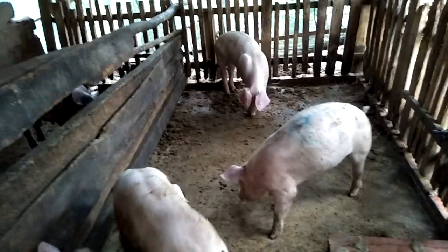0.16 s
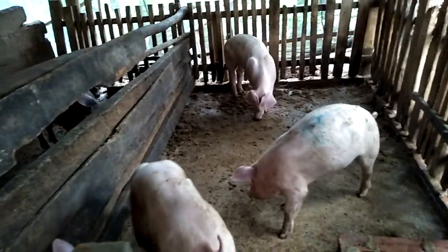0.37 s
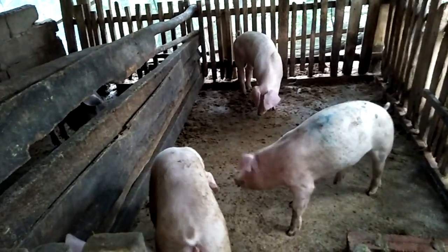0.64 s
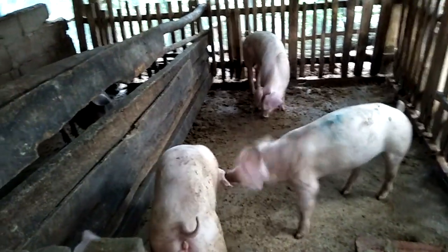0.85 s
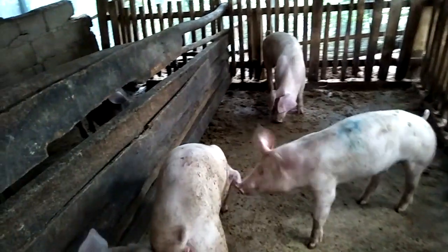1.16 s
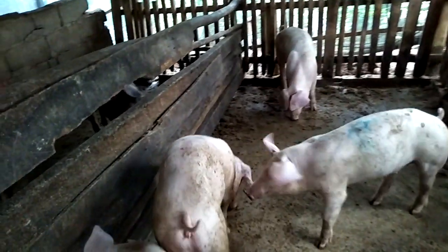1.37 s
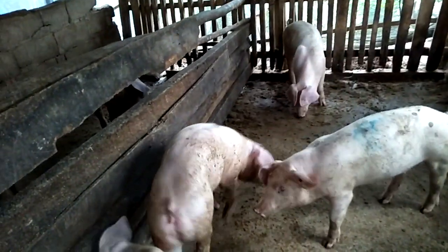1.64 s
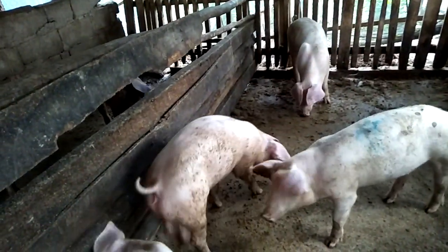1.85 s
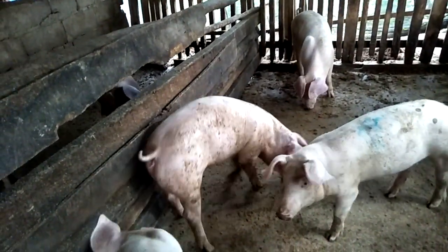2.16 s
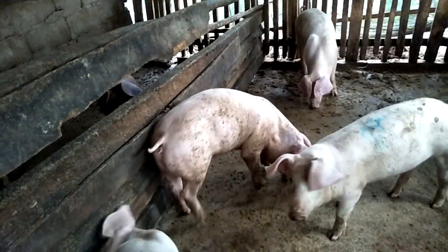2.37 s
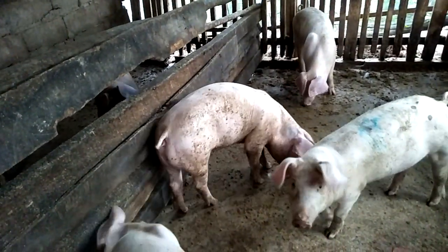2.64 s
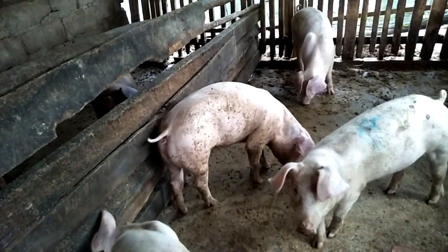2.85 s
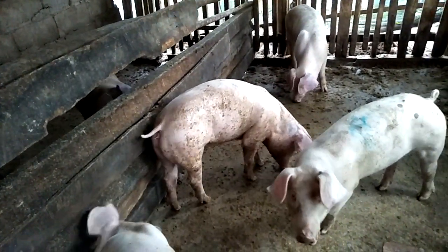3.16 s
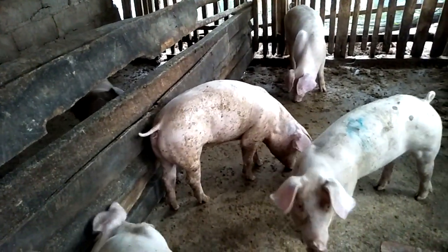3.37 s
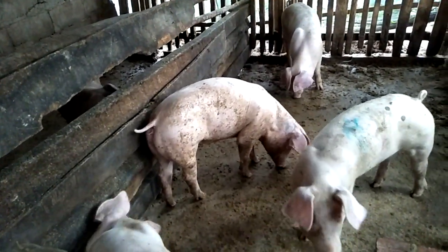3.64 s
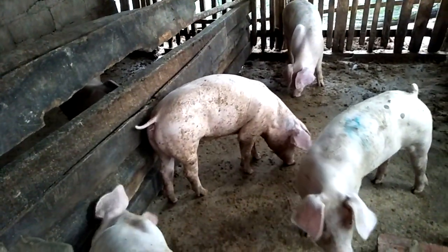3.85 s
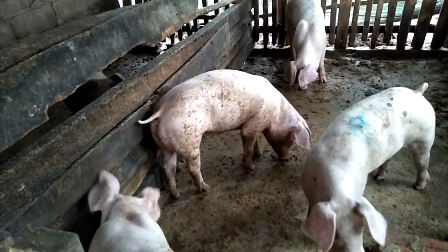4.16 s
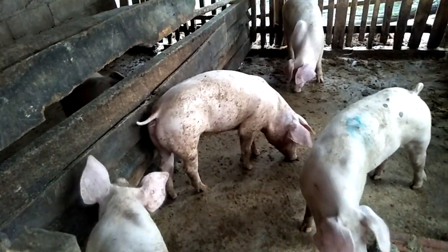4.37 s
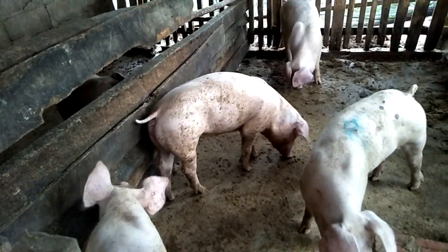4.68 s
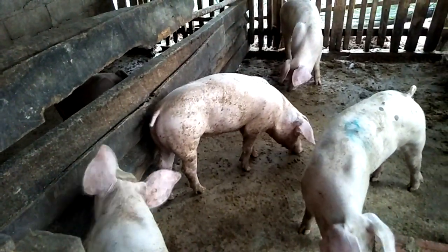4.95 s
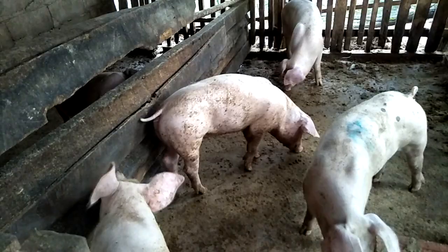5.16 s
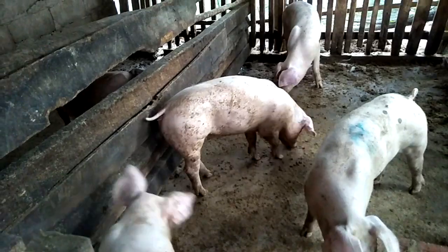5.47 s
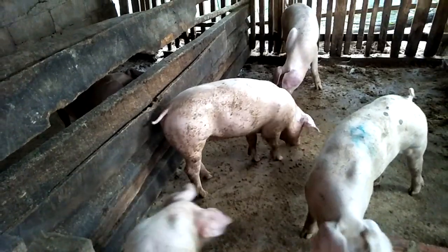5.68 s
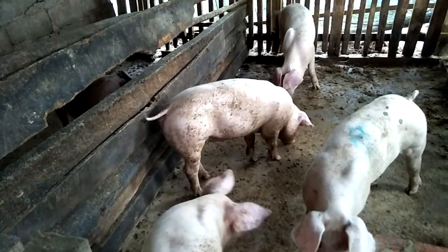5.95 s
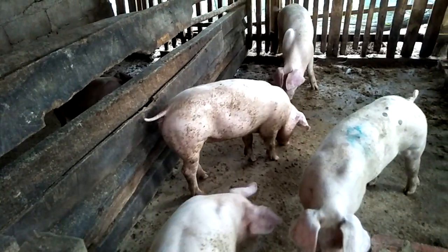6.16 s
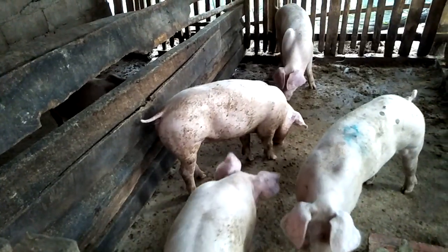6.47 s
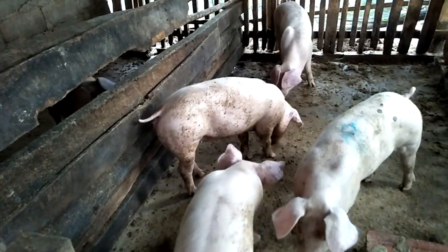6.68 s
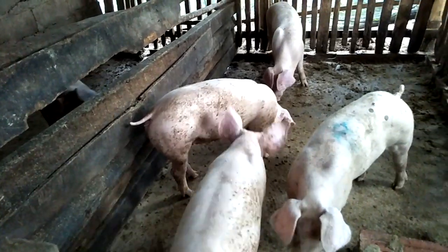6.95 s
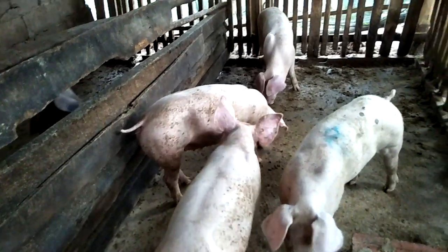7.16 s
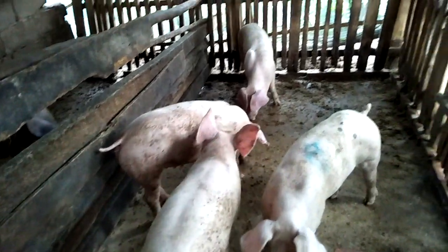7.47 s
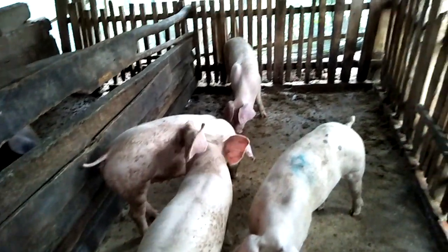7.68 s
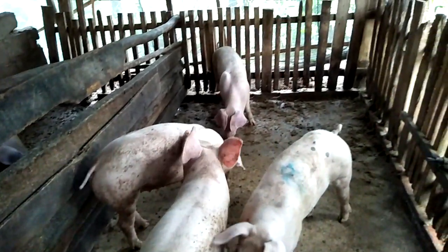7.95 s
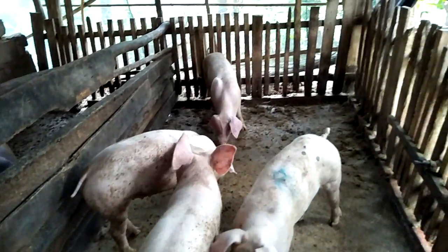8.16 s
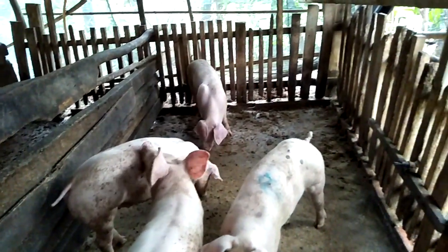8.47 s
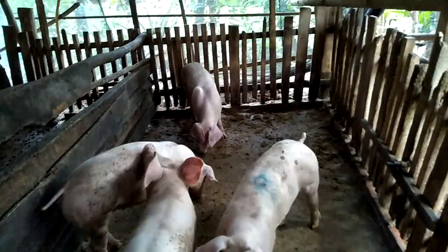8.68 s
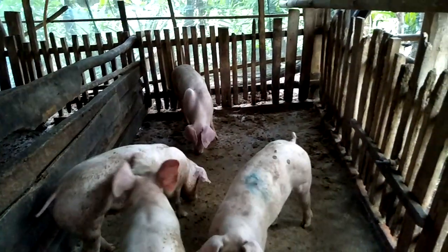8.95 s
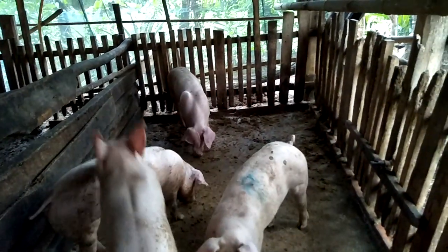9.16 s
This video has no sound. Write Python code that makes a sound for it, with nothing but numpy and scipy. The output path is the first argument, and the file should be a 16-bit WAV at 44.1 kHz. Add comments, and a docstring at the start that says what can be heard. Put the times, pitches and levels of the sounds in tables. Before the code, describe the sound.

Close, irregular nasal pig grunts with wet sniffing, short whines, crackling snorts and two hoarse squawks in a small pen.

```python
"""A hoarse nasal croon opens the scene, then young pigs snuffle, whine and grunt in a wooden pen close by.
Grunts, hums and nasal calls are vocal-fold pulses or tones ringing an airway; whines are gliding harmonics.
Snorts are palate claps, snuffles are turbulent air in a wet snout, narrow resonances give hollow tones and
thin whistles, and ears, snouts and trotters strike soft blows. The pen answers each of these briefly,
over quiet air and a weakening low drone."""
import sys
import numpy as np
from scipy import signal
from scipy.fft import rfft, irfft, next_fast_len
from scipy.io import wavfile
from scipy.ndimage import map_coordinates

SR = 44100
rng = np.random.default_rng(int(sys.argv[2]) if len(sys.argv) > 2 else 0)


def persist_wave(psi):
    """Save psi, clipped to +-1, as 16-bit WAV."""
    counts = np.round(np.clip(psi, -1, 1) * 32767).astype(np.int16)
    wavfile.write(sys.argv[1], SR, np.atleast_2d(counts).T)


N = 411012

THROAT_SAG_DB_PER_S, CHEST_SAG_DB_PER_S = 8, 9.5  # the push weakens while it is held


def amp(db):
    """Decibels to amplitude ratio: 20 dB is a factor of ten."""
    return 10 ** (np.asarray(db) / 20)


def unit(x):
    """Normalisation by effective value: the result has rms 1."""
    return x / np.sqrt(np.mean(x ** 2) + 1e-20)


def along(points, hz):
    """Interpolation on a logarithmic frequency axis between (Hz, value) points."""
    f, v = np.transpose(points)
    return np.interp(np.log(hz + 1), np.log(f + 1), v)


def add(track, s, x):
    """Superposition: x is summed into the track from time s in seconds."""
    start = max(0, round(s * SR))
    track[start:start + len(x)] += x[:max(0, N - start)]


def wobble(n, rate):
    """Slow random modulation: a smooth curve through random knots, rate of them a second."""
    knots = rng.standard_normal(int(n * rate / SR) + 4)
    return map_coordinates(knots, [np.arange(n) * rate / SR])


def noise(n, spectrum):
    """Spectral shaping: white noise weighted by (Hz, dB) points, rms 1."""
    m = next_fast_len(n)
    white = rfft(rng.standard_normal(m))
    gains = amp(along(spectrum, np.fft.rfftfreq(m, 1 / SR)))
    return unit(irfft(white * gains, m)[:n])


def gate(n, fade):
    """Linear onset and release: soft edges of fade seconds on n samples."""
    i = np.arange(n)
    return np.clip(np.minimum(i, n - i) / (fade * SR), 0, 1)


def resonate(x, hz, width, order=3):
    """Heterodyne filtering: shift a moving centre to zero, low-pass, shift back; a steep-sided resonance."""
    carrier = np.exp(2j * np.pi * np.cumsum(hz + np.zeros(len(x))) / SR)
    sides = signal.butter(order, min(width / 2, SR / 4), fs=SR, output='sos')
    return np.real(carrier * signal.sosfilt(sides, x / carrier))


def pen(x, near_db, tail_db, near_t60=0.093):
    """Room response: early scatter and a decaying tail as newly drawn noise; the response has energy 1."""
    # Reverberation time of the pen. Each row: frequency in Hz, time to fall by 60 dB in seconds.
    tail_t60 = [(100, 0.51), (500, 0.48), (2500, 0.38), (6000, 0.43), (14000, 0.41)]
    hz, t, z = signal.stft(rng.standard_normal((2, SR // 2)), SR, nperseg=256)
    near = signal.istft(z[0] * amp(-60 * t / near_t60), SR, nperseg=256)[1]
    tail = signal.istft(z[1] * amp(-60 * t / along(tail_t60, hz)[:, None]), SR, nperseg=256)[1]
    echo = amp(near_db) * near / np.linalg.norm(near) + amp(tail_db) * tail / np.linalg.norm(tail)
    gap = np.zeros(round(0.00198 * SR))  # silence between the direct sound and the echo
    response = np.concatenate([[1], gap, echo])
    return signal.fftconvolve(x, response / np.linalg.norm(response))


def flutter(n, rate, rough, jitter=0.11, scatter_db=3.0, decay_s=0.013, leak=0.67):
    """Pulsed excitation: uneven flaps, each letting out a puff of turbulent air."""
    cycles = np.cumsum(rate * np.exp(jitter * wobble(n, rate))) / SR
    flaps = np.diff(np.floor(cycles + .8), prepend=0)  # one impulse a cycle
    flaps = flaps * amp(scatter_db * rng.standard_normal(n))
    opening = signal.lfilter([1], [1, -np.exp(-1 / (decay_s * SR))], flaps)
    air = (unit(opening) + leak) * rng.standard_normal(n)
    return np.sqrt(1 - rough) * unit(flaps) + np.sqrt(rough) * unit(air)


def effort(t, attack, hold, release, sag_db):
    """Breath-pressure envelope in dB of one push: it builds, sags slowly while held, then lets go."""
    attack_db, release_db = 8.5, 23  # rise over the attack, further fall over the release
    building = np.clip(1 - t / attack, 0, 1)
    letting_go = np.maximum(t - attack - hold, 0) / release
    return -attack_db * building - sag_db * np.clip(t - attack, 0, hold) - release_db * letting_go


def yard(drift_db=1.5):
    """Stationary background: drifting coloured noise of quiet farmyard air, and a narrow-band drone."""
    # Spectrum of the quiet air. Each row: frequency in Hz, relative level in dB.
    air_spectrum = [(25, -5), (90, -5.5), (180, -6.5), (290, -3), (450, -16.5), (1000, -16), (2300, -12.5),
                    (4000, -23.5), (8000, -29), (15700, -25.5)]
    # The drone weakening. Each row: time in seconds, level in dB.
    drone_levels = [(0, -58.5), (3.9, -63), (5.0, -63), (6.0, -66.5), (9.3, -72.5)]
    air_db, drone_hz, drone_width_hz = -62.5, 131.2, 30
    drone = unit(resonate(rng.standard_normal(N), drone_hz, drone_width_hz))
    drone_db = np.interp(np.arange(N) / SR, *np.transpose(drone_levels))
    air = amp(air_db + drift_db * wobble(N, 8.3)) * noise(N, air_spectrum)
    return air + amp(drone_db) * drone


def blow(db, thud_db, snap_db, length):
    """Damped impact: a hollow modal thud, a smack of skin and a wet snap, falling 60 dB in length seconds."""
    # Modes of the hollow thud. Each row: frequency in Hz, width in Hz, relative level in dB.
    thud_modes = [(700, 180, -10), (880, 130, -4.5), (1110, 170, -6), (1336, 150, -8)]
    # Smack of skin. Each row: frequency in Hz, relative level in dB.
    smack_spectrum = [(100, -12.5), (300, -7.5), (900, -21.5), (2250, 0), (2800, -6), (3600, -18),
                      (7000, -63)]
    # Wet snap. Each row: frequency in Hz, relative level in dB.
    snap_spectrum = [(2000, -15), (3500, -6), (4800, -4.5), (6500, -19), (9000, -28), (13000, -17.5),
                     (16000, -38.5)]
    t = np.arange(SR // 4) / SR
    n = len(t)
    push = rng.standard_normal(n)
    thud = unit(sum(amp(level) * resonate(push, hz, width) for hz, width, level in thud_modes))
    smack = amp(1.0) * noise(n, smack_spectrum)
    sound = amp(thud_db) * thud + smack + amp(snap_db) * noise(n, snap_spectrum)
    shape = amp(-60 * t / length) * (1 - np.exp(-t / 0.0018))  # decay, and an onset of 1.8 ms
    return amp(db - 7.5) * pen(sound * shape, near_db=-14.0, tail_db=-4.5)


def knocks():
    """Impact excitation: ears slap against a shaking head; snouts and trotters bump boards and floor."""
    # Ear slaps. Each row: start in seconds, level in dB before the cut of 7.5 dB in blow(),
    # thud in dB, snap in dB.
    ear_slaps = [(0.9261, -15, -31, -1), (0.981, -12, -1.5, -28), (1.045, -12, -0.5, -17),
                 (1.114, -21.5, 10, -18), (1.176, -10, -31, -16), (1.24, -13, 1, -15.5),
                 (1.293, -15.5, -32, -15.5)]
    # Snouts and trotters. Each row: the same four columns, then time to fall by 60 dB in seconds.
    bumps = [(3.874, -27, -4.5, -44, 0.13), (4.659, -33, -1.5, -12, 0.1), (7.447, -28.5, -13.5, -8.5, 0.14)]
    slap_s = 0.057
    out = np.zeros(N)
    for s, db, thud_db, snap_db in ear_slaps:
        add(out, s, blow(db, thud_db, snap_db, slap_s))
    for s, db, thud_db, snap_db, length in bumps:
        add(out, s, blow(db, thud_db, snap_db, length))
    return out


def cavity_ring(length, hz, width, glide, wander=0.11):
    """Cavity resonance: fluttering air rings a resonance whose pitch glides; rms 1."""
    n = round(length * SR)
    centre = hz * np.linspace(1, glide, n) + wander * width * wobble(n, 18.15)
    return unit(resonate(flutter(n, 45, 0.94, scatter_db=5.5), centre, width))


def near_floor(x):
    """Comb filtering: the floor under a swaying snout returns a copy, so thin peaks slide through the noise."""
    reflection, delay_s, sway = 0.8, 0.0024, 0.079
    i = np.arange(len(x))
    lag = delay_s * SR * np.exp(sway * wobble(len(x), 6.7))
    return (x + reflection * np.interp(i - lag, i, x)) / np.hypot(1, reflection)


def swelling(x, db, sputter_db=2.0):
    """Amplitude modulation: one sputtering swell, heard in the pen."""
    n = len(x)
    swell = np.sin(np.pi * np.arange(n) / n) * amp(db + sputter_db * wobble(n, 128))
    return pen(swell * x, near_db=-1.5, tail_db=-3.5, near_t60=.05)


def snuffles(hiss_follow=0.6):
    """Turbulent flow: air swells through a wet snout and hisses at the nostrils."""
    # Each row: start in seconds, length in seconds, level in dB, centre in Hz, width in Hz,
    # hiss in dB, fizz in dB, glide as last over first.
    breaths = [(0.19, 0.4, -36, 1900, 890, -4.5, -44.5, 0.83),
               (1.581, 0.21, -38.5, 2220, 1240, -6.5, -36.5, 1.3),
               (2.305, 0.21, -32.5, 3050, 875, -14, -36, 0.73),
               (3.842, 0.11, -49.5, 1790, 1910, -33, -15, 0.62),
               (4.077, 0.16, -48.5, 2760, 910, -4, -15.5, 0.91),
               (4.314, .19, -43, 2300, 1500, -9.5, -14.5, 1.1),
               (4.535, 0.19, -46.5, 2620, 1650, -10, -19.5, 0.83),
               (4.773, 0.34, -52, 1875, 476, -11.5, -7, 1.12),
               (5.083, 0.36, -42.5, 1790, 636, -24, -31.5, 0.89),
               (5.384, 0.19, -34.5, 1570, 736, -14.5, -31, 1.3),
               (5.526, 0.32, -40.5, 2180, 1420, -11.5, -23.5, 0.92),
               (6.15, 0.16, -46, 2600, 1500, -1.5, -15.5, 0.81),
               (7.088, 0.4, -66, 3240, 500, -8, -4.5, 0.95)]
    # Hiss at the nostrils. Each row: frequency in Hz, width in Hz, relative level in dB.
    hiss_modes = [(3150, 530, 0), (3983, 600, -1), (4684, 650, -0.5), (5970, 860, -13), (8000, 3200, -17.5)]
    # Fizz of the air. Each row: frequency in Hz, relative level in dB.
    fizz_spectrum = [(5000, -45.5), (8000, -7.5), (11000, -6.5), (13200, 6.5), (15500, -8.5)]
    out = np.zeros(N)
    for s, length, db, hz, width, hiss_db, fizz_db, glide in breaths:
        cavity = cavity_ring(length, hz, width, glide)
        n = len(cavity)
        slide = glide ** (hiss_follow * np.linspace(-.5, .5, n))  # the hiss follows part of the glide
        hiss = unit(sum(amp(level) * unit(resonate(rng.standard_normal(n), f * slide, w))
                        for f, w, level in hiss_modes))
        air = cavity + amp(hiss_db) * hiss + amp(fizz_db) * noise(n, fizz_spectrum)
        add(out, s, swelling(near_floor(air), db))
    return out


def narrow_tones():
    """Narrow resonance: hollow voiced tones near 600-1100 Hz in grunts and squawks, and thin higher whistles."""
    # Each row: start in seconds, length in seconds, level in dB, first pitch in Hz, glide as last over first.
    tones = [(1.721, 0.059, -29.5, 728, 0.99), (3.164, 0.12, -34.5, 746, 1.06), (4.8, 0.5, -58, 3305, 0.97),
             (5.907, 0.082, -44.5, 1560, 0.97), (7.231, 0.062, -48.5, 1860, 1),
             (7.682, 0.039, -28, 618, 0.91), (9.058, 0.12, -30.5, 1095, 0.95)]
    out = np.zeros(N)
    for s, length, db, hz, glide in tones:
        width = 0.062 * hz
        add(out, s, swelling(cavity_ring(length, hz, width, glide), db))
    return out


def whines(jitter=0.0075, shimmer_db=2.5, uneven_db=2.5):
    """Harmonic series: the folds vibrate regularly while pitch, effort and mouth shape glide."""
    # One curve a whine. Each row: time in seconds, pitch in Hz, level in dB, shift of the resonances
    # as a ratio, boost of the upper harmonics in dB, hoarse air in dB.
    curves = [
        [(0.2, 319, -46.5, 0.88, -8, -5), (0.28, 385.3, -40, 0.74, -0.5, -4),
         (0.8, 357.4, -45, 1.08, -9.5, -2.5)],
        [(1.95, 341.4, -53, 1.44, -17, -3), (2.095, 388.6, -32.5, 1.13, 3, -4)],
        [(2.71, 443, -38, 0.97, -2, -7), (2.8, 387.7, -31.5, 1.05, 2, -7.5),
         (2.904, 359.7, -28, 1.03, 2.5, -18.5), (3.002, 342, -35, 0.95, 5, -13),
         (3.125, 393, -30.5, 0.95, 0, -6)],
    ]
    # Response of the nasal tract. Each row: frequency in Hz, relative level in dB.
    tract = [(150, -13), (370, -4.5), (740, -9), (1100, -12.5), (1450, -10.5), (1820, 5.5), (2200, 0),
             (2600, -2), (2950, -10), (3400, -22), (4800, -20), (8000, -65.5), (15000, -70.5)]
    out = np.zeros(N)
    for rows in curves:
        times, *columns = np.transpose(rows)
        t = np.arange(times[0], times[-1], 1 / SR)
        n = len(t)
        hz, db, shift, bright_db, breath_db = (np.interp(t, times, c) for c in columns)
        phase = 2 * np.pi * np.cumsum(hz * (1 + jitter * wobble(n, 260))) / SR
        k = np.arange(1, 17)[:, None]  # harmonic numbers
        gains = amp(along(tract, k * hz / shift) + bright_db * (k > 2))
        uneven = amp(uneven_db * np.array([wobble(n, 19.3) for _ in k]))  # each partial swells on its own
        partials = np.cos(k * phase + rng.uniform(0, 2 * np.pi, k.shape))
        tone = unit(np.sum(gains * uneven * partials, axis=0) / np.linalg.norm(gains, axis=0))
        voice = (tone + amp(breath_db) * noise(n, tract)) * amp(db + shimmer_db * wobble(n, 109.7))
        add(out, times[0], pen(gate(n, 0.0067) * voice, near_db=-4.5, tail_db=-3.5))
    return out


def nasal_calls(rows, modes, rough, wander=0.035):
    """Source and filter: hoarse pulses ring the few resonances of a nearly closed mouth."""
    out = np.zeros(N)
    for s, attack, hold, release, db, rate, glide in rows:
        t = np.arange(0, attack + hold + release, 1 / SR)
        n = len(t)
        folds = flutter(n, rate, rough, jitter=.15, scatter_db=4.0)
        jaw = glide ** np.linspace(-.5, .5, n) * np.exp(wander * wobble(n, 25.4))
        voice = unit(sum(amp(level) * unit(resonate(folds, hz * jaw, width)) for hz, width, level in modes))
        shape = gate(n, attack / 2) * amp(db + effort(t, attack, hold, release, THROAT_SAG_DB_PER_S))
        add(out, s, pen(shape * voice, near_db=-3, tail_db=-4.0, near_t60=0.082))
    return out


def croons_yaps_moans_squawks():
    """Timbre by formants: four kinds of nasal call differ in pulse rate, roughness and resonances."""
    # Calls. Each row: start in seconds, attack in seconds, hold in seconds, release in seconds,
    # level in dB, pulses a second, glide of the resonances as last over first.
    croons, yaps = [(0.0, 0.065, 0.23, 0.1, -35, 72.16, 1.09)], [(2.232, 0.0066, 0.011, 0.08, -28.5, 160, 0.96),
                                    (2.328, 0.01, 0.026, 0.049, -27.5, 170, 0.91)]
    moans, squawks = [(6.3, 0.034, 0.12, 0.25, -43.5, 69.9, 1), (6.48, 0.045, 0.15, 0.09, -44, 59.9, 1.11),
                      (6.678, 0.0046, 0.11, 0.07, -39, 75.5, 0.91)], [(6.803, 0.019, 0.069, 0.12, -26, 132.8, 0.95),
                                     (9.06, 0.011, 0.089, 0.089, -24.5, 154.4, .98)]
    # Resonances of each kind. Each row: frequency in Hz, width in Hz, relative level in dB.
    croon_modes, yap_modes = [(300, 138, -5), (2194, 230, -2.5), (2300, 780, -3.5), (2920, 3900, -15)], [(270, 130, -9), (943, 147, -5.5), (1378, 210, -2),
                                                   (1910, 140, -4.5), (2400, 310, 0), (3340, 1100, -15)]
    moan_modes, squawk_modes = [(970, 290, -4), (1684, 400, -1), (2270, 470, -0.5), (3290, 210, -12.5),
                                (3840, 200, -21.5), (4880, 270, -24)], [(202, 180, -10.5), (443, 200, -7), (1107, 136, -8.5),
                                                    (1520, 375, -7.5), (1900, 180, -4), (2290, 386, 0),
                                                    (3380, 330, -13.5), (4850, 320, -33.5),
                                                    (1500, 1930, -11)]
    out = nasal_calls(croons, croon_modes, rough=0.46, wander=0.015)
    out += nasal_calls(yaps, yap_modes, rough=0.58)
    out += nasal_calls(moans, moan_modes, rough=0.44)
    out += nasal_calls(squawks, squawk_modes, rough=0.62, wander=0.023)
    return out


def hums(jitter=0.033):
    """Near-sinusoidal phonation: in the softer grunts the chest note settles into a nearly clean tone."""
    # Each row: start in seconds, length in seconds, level in dB, first pitch in Hz, last pitch in Hz.
    chest_notes = [(0.51, 0.14, -29.5, 292.5, 307), (5.12, 0.22, -38.5, 224, 209),
                   (8.87, 0.097, -30.5, 236, 256), (9.015, 0.057, -43.5, 365, 410)]
    out = np.zeros(N)
    for s, length, db, first_hz, last_hz in chest_notes:
        n = round(length * SR)
        hz = np.linspace(first_hz, last_hz, n) * (1 + jitter * wobble(n, 122))
        tone = unit(np.sin(2 * np.pi * np.cumsum(hz) / SR))
        swell = gate(n, length / 3) * amp(db + 2.3 * wobble(n, 70))
        add(out, s, pen(swell * tone, near_db=-5.5, tail_db=-10.0))
    return out


def snorts(air=0.043, air_t60=0.013, throat_hz=2380, chest_db=-8, mouth_db=-10, pharynx_db=-5):
    """Impulse response: the soft palate claps shut with a sharp crack, then the airway rings briefly."""
    # Each row: start in seconds, level in dB before the cut of 17.5 dB below.
    claps = [(0.9262, -11), (1.44, -24.5), (1.464, -22.5), (1.72, -20.5), (1.748, -21), (1.775, -22),
             (3.141, -14.5), (3.163, -18.5), (5.4527, -13), (5.4816, -9.5), (5.511, -9.5), (6.031, -15.5),
             (6.057, -15.5), (6.168, -14.5), (6.188, -15), (7.62, -14.5), (7.646, -9.5), (7.672, -10),
             (7.69, -8), (7.709, -10.5), (7.912, -21.5), (8.008, -14.5), (8.735, -22)]
    # Upper resonances. Each row: multiple of the throat pitch, width in Hz, relative level in dB.
    throat_modes = [(1, 262, 3), (1.168, 220, -2), (1.75, 800, -10.5)]
    crack_db, crack_width_hz = -2, 1840
    modes = [(k * throat_hz, width, level) for k, width, level in throat_modes]
    modes += [(278, 140, chest_db), (760, 395, mouth_db), (1670, 340, pharynx_db)]  # Hz, width Hz, dB
    modes += [(throat_hz, 100, -12.5)]  # a narrow ring
    out = np.zeros(N)
    t = np.arange(SR // 20) / SR
    for s, db in claps:
        shock = (t == 0) + air * amp(-60 * t / air_t60) * rng.standard_normal(len(t))
        clap = sum(amp(level) * unit(resonate(shock, hz, width, order=2)) for hz, width, level in modes)
        clap += amp(crack_db) * unit(resonate(shock, throat_hz, crack_width_hz))
        add(out, s, amp(db - 17.5) * pen(clap, near_db=-4.0, tail_db=-6.5))
    return out


def airway(x, chest_hz, mouth_hz, throat_hz, chest_share=0.75, mouth_width=430, belly_hz=112, belly_width=105):
    """Formant filtering: the throat, chest, belly, mouth and nose parts of a pig's voice, each of rms 1."""
    # Throat resonances. Each row: multiple of the throat pitch, width in Hz, relative level in dB.
    throat_modes = [(.71, 246.5, 5), (.96, 376, 6), (1.11, 261, 5)]
    # Nose resonances. Each row: multiple of the throat pitch, width in Hz, relative level in dB.
    nose_modes = [(1.52, 313.4, 10), (1.8, 415, 2), (2.14, 330, -2), (4.3, 8030, -32)]

    def bank(modes):
        """Parallel resonators: modes tuned in proportion to the throat pitch."""
        return sum(amp(db) * resonate(x, k * throat_hz, width) for k, width, db in modes)

    low = signal.sosfilt(signal.butter(4, 50, 'highpass', fs=SR, output='sos'), x)  # no rumble below 50 Hz
    chest = resonate(low, chest_hz, chest_share * np.mean(chest_hz))
    belly = resonate(low, belly_hz, belly_width)
    mouth = resonate(x, mouth_hz, mouth_width)
    return np.array([unit(p) for p in (bank(throat_modes), chest, belly, mouth, bank(nose_modes))])


def grunts(wander=0.033, jitter=.12, scatter_db=3.2):
    """Source and filter: rough pulse trains ring the airway, whose resonances slide as jaw and tongue move."""
    # Each row: start in seconds, attack in seconds, hold in seconds, release in seconds, throat in dB,
    # chest in dB, belly in dB re chest, mouth in dB re throat, nose in dB re throat, pulses a second,
    # roughness from 0 to 1, chest in Hz, mouth in Hz, throat in Hz, throat glide as last over first.
    pushes = [(0.469, 0.13, 0.032, 0.071, -30.5, -34, -14, -14.5, -15.5, 108, 0.4, 315, 809, 2187, 1.02),
              (0.801, 0.063, 0.048, 0.018, -27, -30.5, -1, -11.5, -21, 43.2, 0.28, 230, 726, 2330, 0.96),
              (1.346, 0.016, 0.31, 0.08, -30.5, -38.5, -5, -14.5, -18, 37, 0.48, 297, 726, 2298, 0.98),
              (1.685, 0.046, 0.05, 0.046, -25.5, -38.5, -2.5, -13.5, -22, 37.4, 0.5, 254, 740, 2400, 1.01),
              (2.076, 0.034, 0.042, 0.25, -34.5, -35, -4.5, -7.5, -13, 32, 0.65, 295, 726, 2450, 0.94),
              (2.637, 0.036, 0.073, 0.11, -29, -33, -5, -15, -22.5, 83, 0.18, 300, 800, 2420, 0.94),
              (3.113, 0.037, 0.044, 0.11, -31.5, -29.5, -2, 0, -9, 46.7, 0.68, 140, 785, 2446, 0.98),
              (3.31, 0.064, 0.18, 0.058, -44, -42.5, -19, -8.5, -17, 37, 0.53, 270, 726, 2270, 0.97),
              (5.07, 0.067, 0.017, 0.19, -34, -37.5, -18, -25.5, -18.5, 58, 0.48, 224, 726, 2540, 0.87),
              (5.996, 0.057, 0.044, 0.063, -25, -33, -0.5, -8, -29, 38.3, 0.5, 165, 760, 2400, 1),
              (6.134, 0.046, 0.0092, 0.081, -21, -28, -6, -15.5, -19, 55, 0.58, 288, 726, 2434, 1.09),
              (6.972, 0.014, 0.026, 0.11, -35.5, -38.5, -15, -14.5, -35, 85, 0.2, 245, 726, 2190, 0.985),
              (7.572, 0.027, 0.058, 0.018, -40, -39, -9, -2.5, -5, 53, 0.7, 278, 640, 2320, 0.91),
              (7.673, 0.02, 0.017, 0.018, -23.5, -33.5, -17, -10, -20, 52, 0.65, 284, 606, 2400, 0.95),
              (7.878, 0.044, 0.14, 0.12, -28, -31.5, -6.5, -13.5, -14, 45.7, 0.25, 265, 760, 2390, 0.98),
              (8.706, 0.028, 0.041, 0.097, -32, -31, -8.5, -6, -7.5, 47.5, 0.44, 270, 880, 2706, 0.97),
              (8.834, 0.021, 0.06, 0.074, -38, -32.5, -5, -9, -12, 58.6, 0.01, 236, 830, 2594, 0.96)]
    soft_attack_s = 0.13  # a push this slow swells in from silence; quicker ones start with an edge
    chest_lag_s = 0.0085  # the chest swells a little after the throat
    out = np.zeros(N)
    for (s, attack, hold, release, throat_db, chest_db, belly_db, mouth_db, nose_db, rate, rough,
         chest_hz, mouth_hz, throat_hz, glide) in pushes:
        t = np.arange(0, attack + hold + release, 1 / SR)
        n = len(t)
        throat = throat_db + effort(t, attack, hold, release, THROAT_SAG_DB_PER_S)
        chest = chest_db + effort(t - chest_lag_s, attack, hold, release, CHEST_SAG_DB_PER_S)
        jaw = np.exp(wander * wobble(n, 22.04))
        folds = flutter(n, rate, rough, jitter, scatter_db)
        parts = airway(folds, chest_hz * jaw, mouth_hz * jaw, throat_hz * np.linspace(1, glide, n) * jaw)
        levels = [throat, chest, chest + belly_db, throat + mouth_db, throat + nose_db]
        voice = np.sum(amp(levels) * parts, axis=0)
        fade = attack * min(attack / soft_attack_s, 1) ** 3
        shape = np.minimum(t / fade, 1) * gate(n, 0.002)
        add(out, s, pen(shape * voice, near_db=1.5, tail_db=-5.5, near_t60=0.082))
    return out


def scene():
    """Linear superposition: all the pigs and the yard at one microphone."""
    background = yard() + knocks()
    breath = snuffles() + narrow_tones()
    voices = whines() + croons_yaps_moans_squawks() + hums() + snorts() + grunts()
    return (background + breath + voices)[None]


def record(dry, ceiling=0.75):
    """Saturation and band limiting: peaks round off below the ceiling, then a sharp low-pass follows."""
    top_hz = 15800
    x = dry / (1 + np.abs(dry / ceiling) ** 6) ** (1 / 6)
    m = next_fast_len(N + SR // 2)
    return irfft(rfft(x, m) * (np.fft.rfftfreq(m, 1 / SR) < top_hz), m)[..., :N]


dry = scene()
out = record(dry)
persist_wave(out)
```